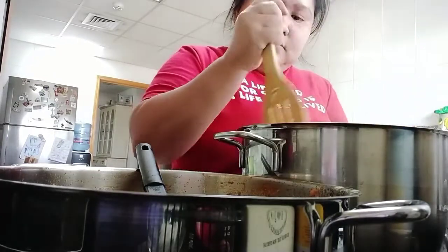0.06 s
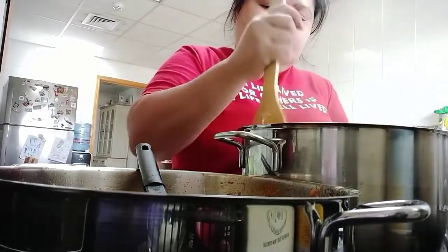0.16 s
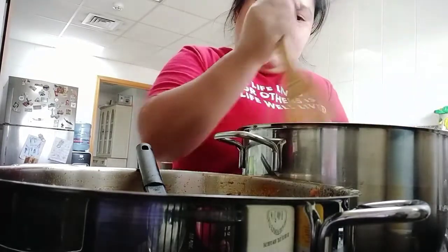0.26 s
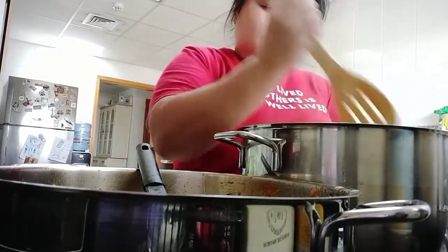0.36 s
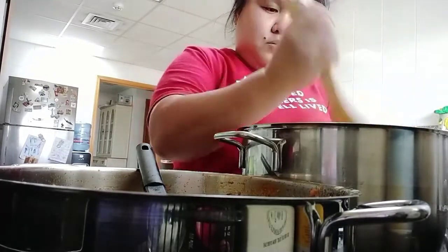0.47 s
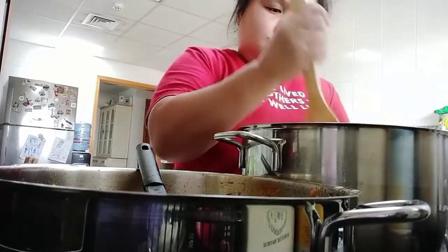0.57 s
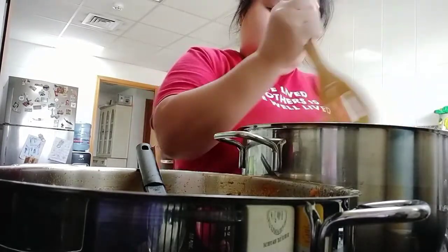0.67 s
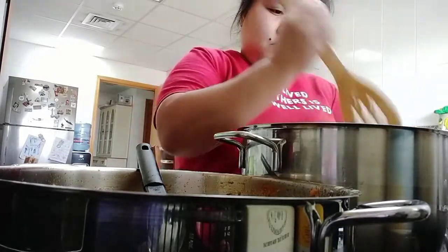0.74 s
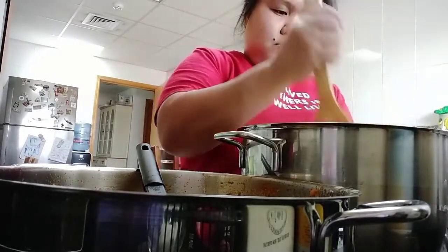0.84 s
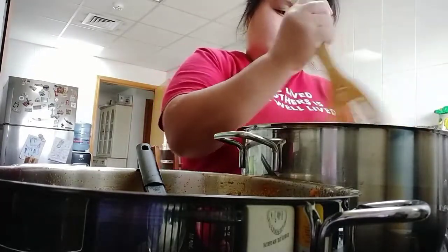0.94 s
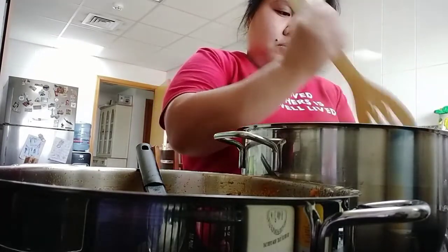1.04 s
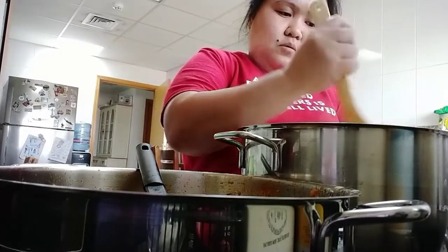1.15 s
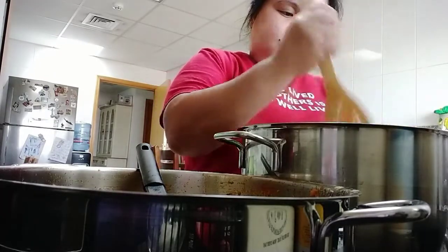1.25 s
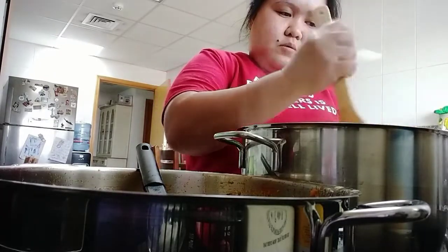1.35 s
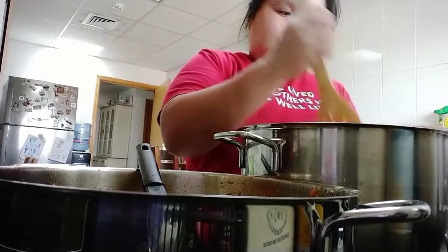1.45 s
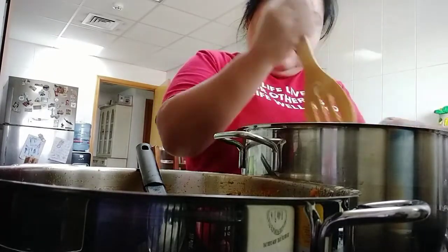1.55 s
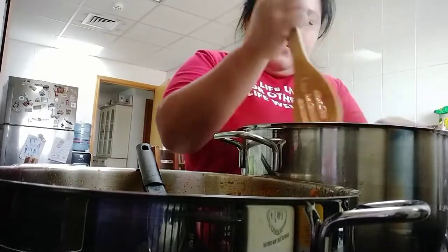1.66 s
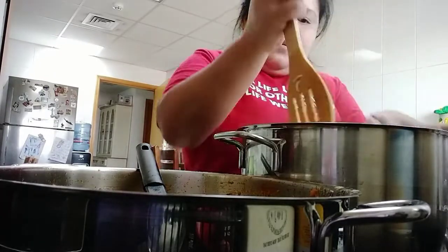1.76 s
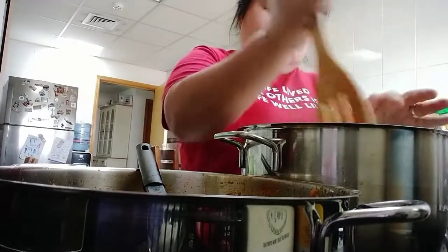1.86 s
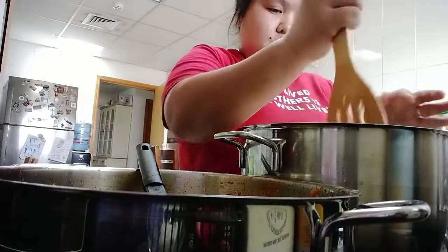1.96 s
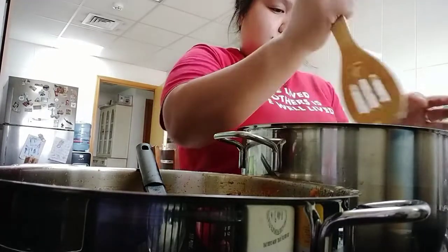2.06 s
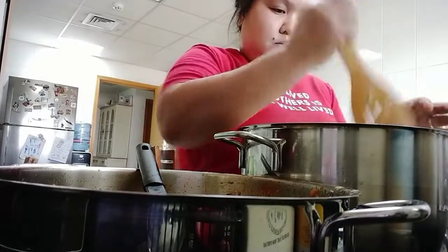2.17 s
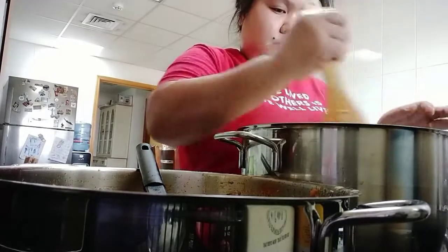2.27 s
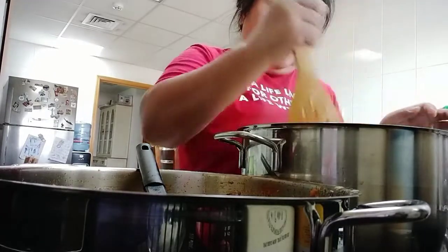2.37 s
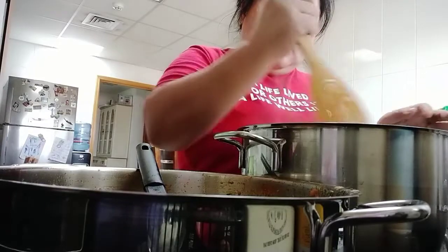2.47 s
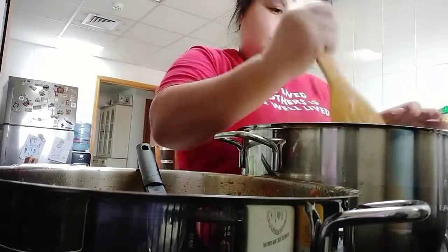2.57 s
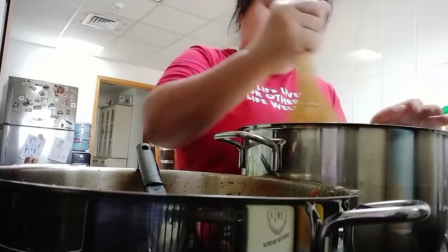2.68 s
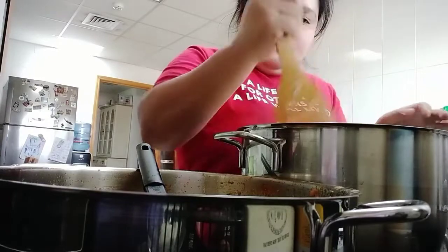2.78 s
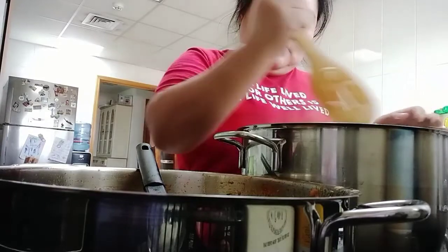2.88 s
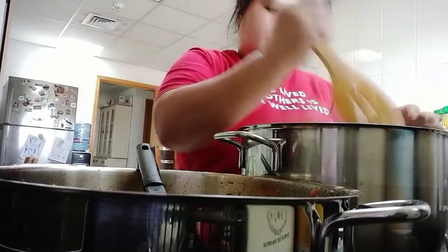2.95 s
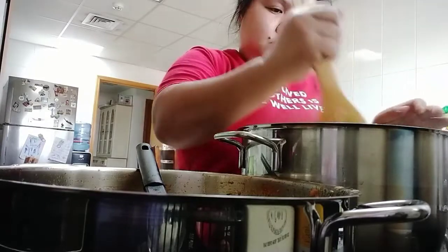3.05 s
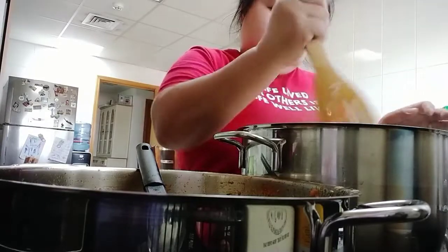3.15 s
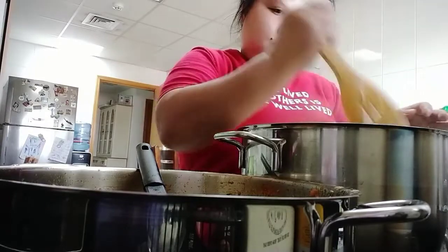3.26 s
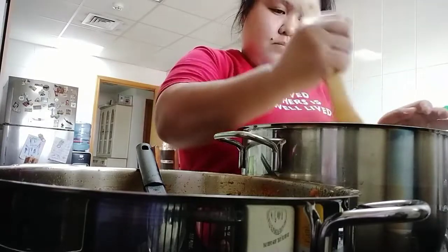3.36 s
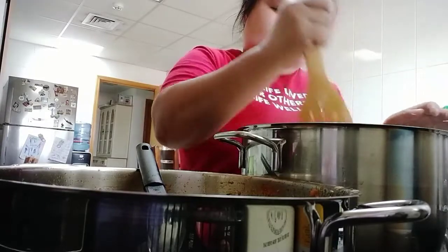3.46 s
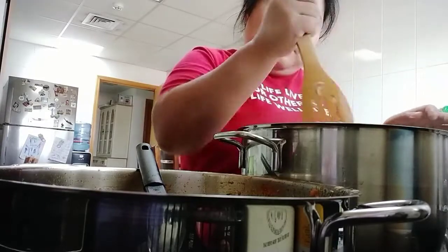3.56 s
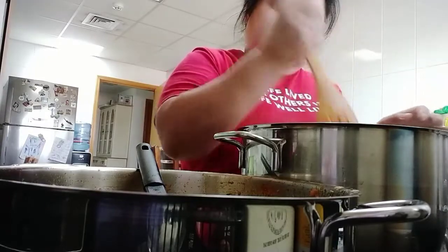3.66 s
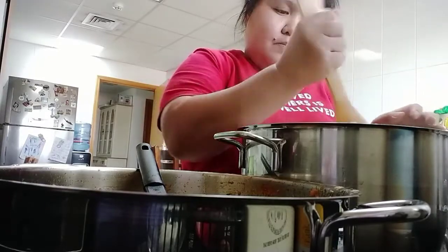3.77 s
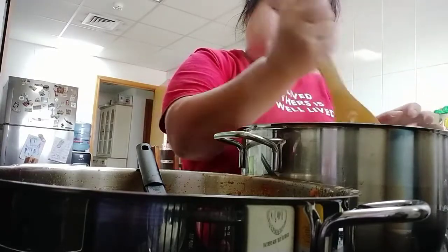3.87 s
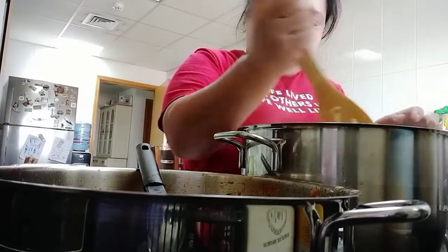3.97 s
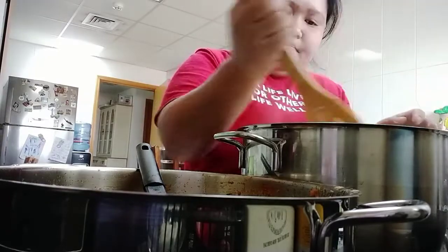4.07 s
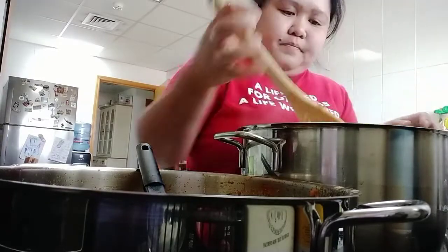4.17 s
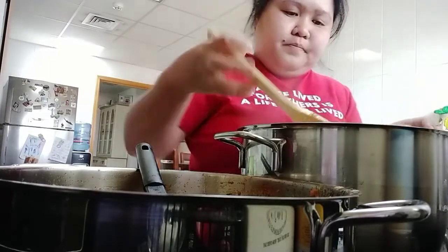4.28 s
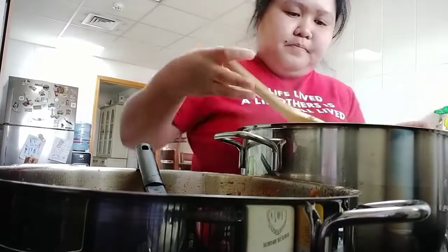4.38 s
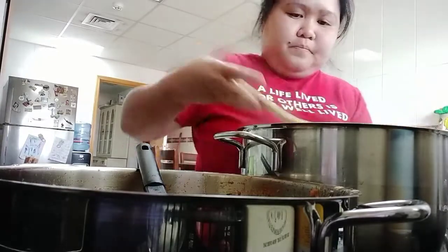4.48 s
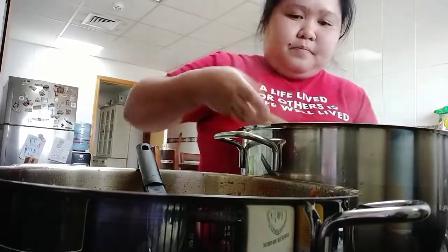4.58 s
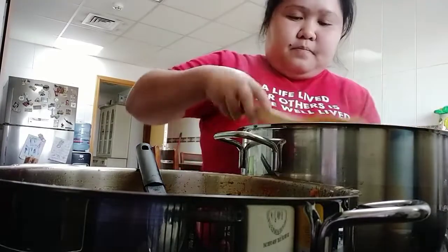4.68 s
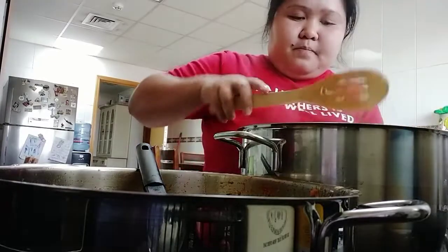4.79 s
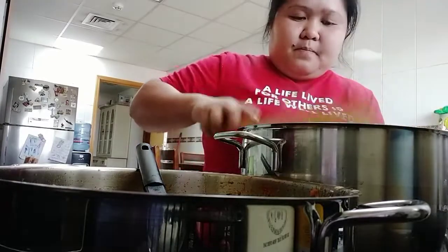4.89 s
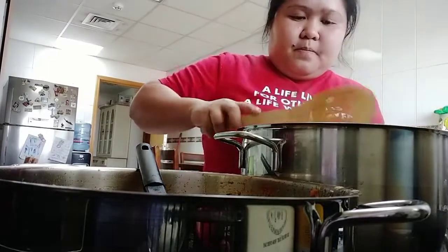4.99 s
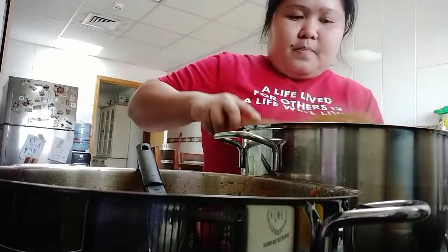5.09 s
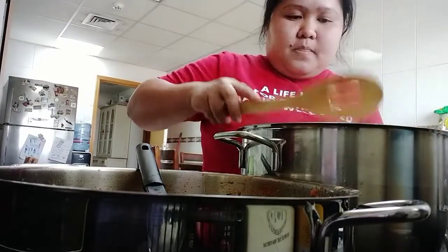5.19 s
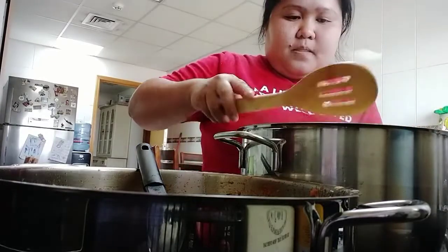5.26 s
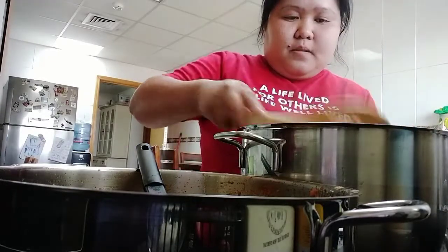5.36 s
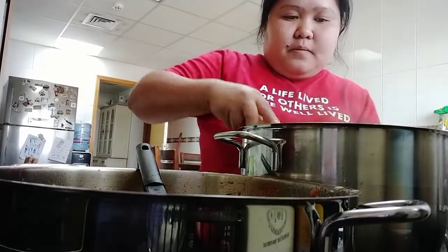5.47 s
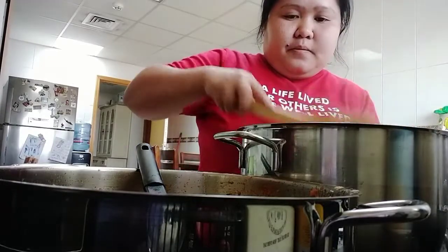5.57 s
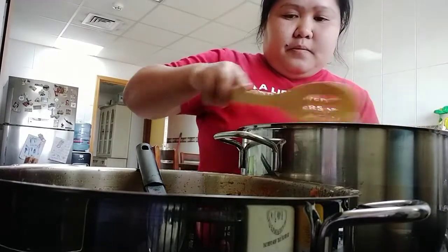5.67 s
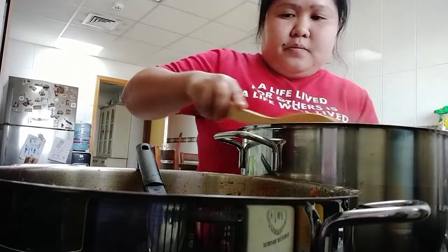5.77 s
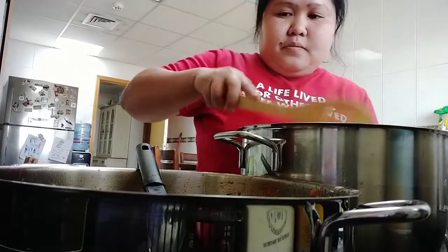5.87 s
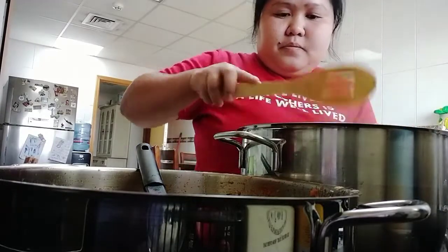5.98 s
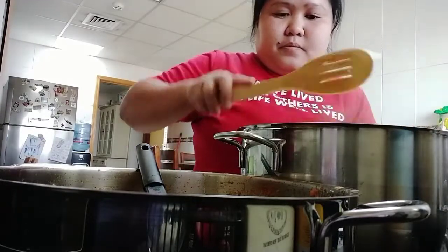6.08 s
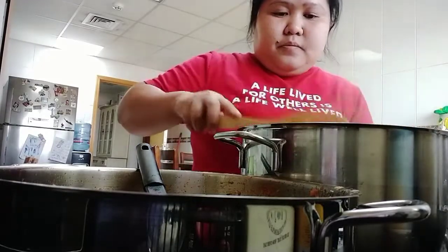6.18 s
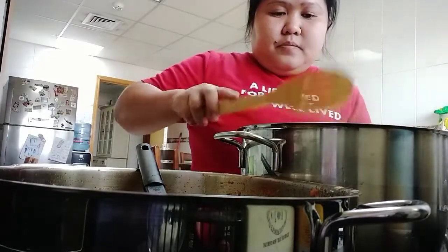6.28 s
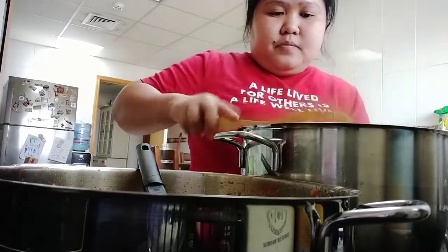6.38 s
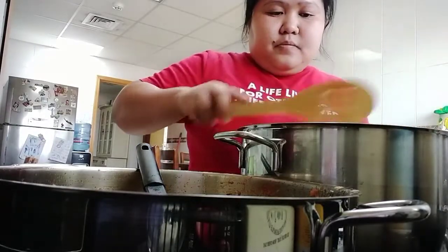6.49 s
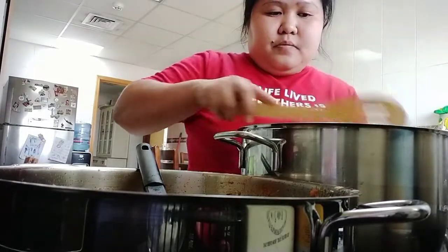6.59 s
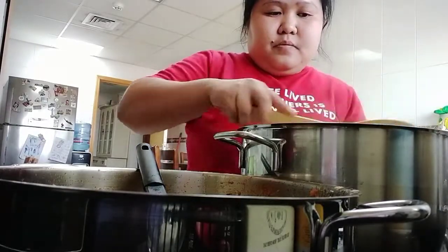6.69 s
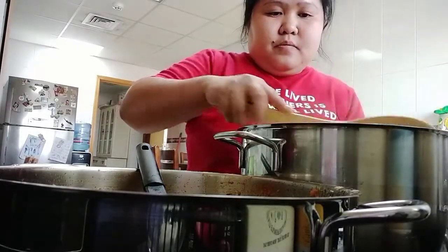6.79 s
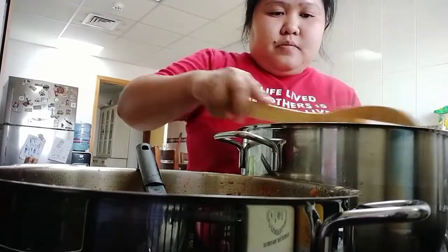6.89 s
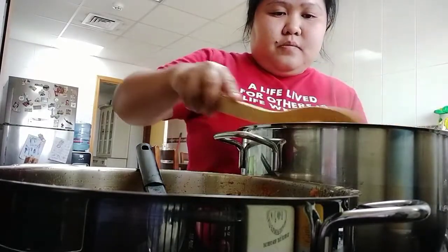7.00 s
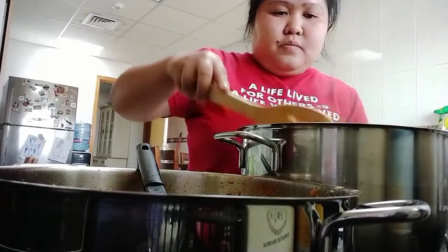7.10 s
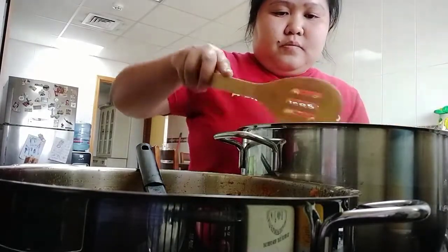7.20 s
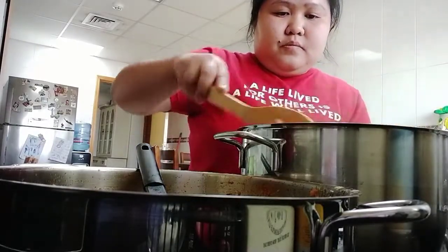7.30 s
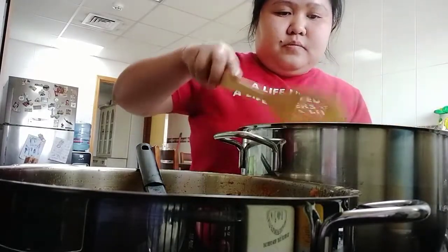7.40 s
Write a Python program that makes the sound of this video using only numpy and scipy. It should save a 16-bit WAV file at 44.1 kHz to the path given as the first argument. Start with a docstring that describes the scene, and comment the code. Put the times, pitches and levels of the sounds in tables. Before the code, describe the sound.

Over a steady burner rush and throbbing low hum, faint stirring and dull bumps lead to four hard wood-on-steel knocks in a tiled kitchen.

```python
"""A wooden spoon bumps and stirs inside a large steel pot, then raps its rim in two pairs of knocks.
Pot and spoon ring as decaying sines; wood on steel, swishes and ticks are shaped noise.
Beneath: a burner's noise rush and rumble, a motor beating against mains hum, a dying clink, thin whistles.
A tiled kitchen answers the knocks with reflections and a tail; a limiter ducks under the loudest peaks."""
import sys
import numpy as np
from scipy import signal
from scipy.fft import rfft, irfft, next_fast_len
from scipy.io import wavfile
from scipy.ndimage import uniform_filter1d, minimum_filter1d, map_coordinates

SR = 44100
rng = np.random.default_rng(int(sys.argv[2]) if len(sys.argv) > 2 else 0)


def generate_wav(signal):
    """Clip the signal to [-1, 1] and save it as 16-bit WAV at the path in sys.argv[1]."""
    frames = np.transpose(np.atleast_2d(signal))
    scaled = np.clip(frames, -1, 1) * 32767
    pcm = np.round(scaled).astype(np.int16)
    wavfile.write(sys.argv[1], SR, pcm)


N = 328104
TIME = np.arange(N) / SR


def amp(db):
    """Decibels to gain."""
    return 10 ** (np.asarray(db) / 20)


def unit(x):
    """x at rms 1."""
    return x / np.sqrt(np.mean(x ** 2) + 1e-20)


def along(points, hz):
    """(pitch_hz, value) points read on a log frequency axis."""
    point_hz, value = np.transpose(points)
    return np.interp(np.log(hz + 1), np.log(point_hz + 1), value)


def filtered(x, response):
    """x times a response of frequency, zero-padded against wrap-around."""
    size = next_fast_len(len(x) + 8192)
    spectrum = rfft(x, size) * response(np.fft.rfftfreq(size, 1 / SR))
    return irfft(spectrum, size)[:len(x)]


def noise(colour, size=N):
    """Noise of rms 1 with the given colour: (pitch_hz, relative_db)."""
    white = rng.standard_normal(size)
    return unit(filtered(white, lambda hz: amp(along(colour, hz))))


def wobble(knots_per_s):
    """A smooth random curve through random knots."""
    knots = rng.standard_normal(int(N * knots_per_s / SR) + 4)
    return map_coordinates(knots, [TIME * knots_per_s])


def fade(t, rise_s, t60_s):
    """A quick swell that dies away."""
    return (1 - np.exp(-t / rise_s)) * amp(-60 * t / t60_s)


def add(track, start_s, sound):
    """Mix a sound into the track, cut at its end."""
    part = track[round(start_s * SR):][:len(sound)]
    part += sound[:len(part)]


def ringing(modes, t, rise_s):
    """Neighbouring modes swing in opposite directions, so the ring takes a few ms to build."""
    ring = 0
    for k, (hz, db, t60_s) in enumerate(modes):
        level = amp(db + rng.normal(0, 0.86))
        ring = ring + (-1) ** k * level * fade(t, rise_s, t60_s) * np.sin(2 * np.pi * hz * t)
    return ring


# room tail by band: pitch_hz, t60_s
KITCHEN_DECAY = [(100, 0.9), (300, 0.69), (700, 0.34), (1400, 0.47), (4400, 0.5), (8000, 0.36),
                 (14000, 0.28)]
# near reflecting surfaces: delay_s, gain
NEAR_SURFACES = [(.00414, .31), (.01566, .2), (.02093, .1)]


def kitchen(x, wet_db):
    """x with its near reflections and a tail in which each band dies at its own speed."""
    hz, t, bands = signal.stft(rng.standard_normal(SR), SR, nperseg=256)
    decay = fade(t, 0.011, along(KITCHEN_DECAY, hz)[:, None])
    tail = signal.istft(bands * decay, SR, nperseg=256)[1]
    answer = amp(wet_db) * tail / np.linalg.norm(tail)
    for delay_s, gain in NEAR_SURFACES:
        answer[round(delay_s * SR)] += gain
    return x + signal.fftconvolve(x, answer)[:len(x)]


# flame and air: pitch_hz, relative_db
FLAME_COLOUR = [(100, 0), (160, -7), (192, 0), (215, -5), (262, 2), (300, -8), (550, -8), (1050, -0.5),
                (1750, -6), (2800, -20.5), (3400, -30.5), (5000, -37.5), (10000, -42.5), (15500, -38.5)]
# low rumble: pitch_hz, relative_db
RUMBLE_COLOUR = [(12, -7.5), (22, 1.5), (33, -0.5), (47, -12), (58, 4.5), (75, -10), (110, -21), (160, -39),
                 (400, -80)]
FLAME_DB, RUMBLE_DB = -54, -59.5


def burner():
    """The flame rushes steadily, wavering a little, over a low rumble."""
    rush = amp(FLAME_DB + 0.34 * wobble(8.2)) * noise(FLAME_COLOUR)
    return rush + amp(RUMBLE_DB) * noise(RUMBLE_COLOUR)


# steady motor lines: pitch_hz, rms_db
MOTOR_LINES = [(21.2, -58.5), (57, -63), (193.1, -76.5), (200, -91), (272, -84)]


def motors():
    """A motor slips just under the mains hum, so the two beat at the slip frequency."""
    mains_hz, slip_hz, quiet_s = 100, 3.448, .04  # quiet_s: a moment when the two oppose
    turn = 2 * np.pi * (TIME - quiet_s)
    mains = amp(-58.0) * np.sin(mains_hz * turn)
    slipping_db = -62.5 + 0.85 * wobble(1.8)
    slipping = amp(slipping_db) * np.sin((mains_hz - slip_hz) * turn + 0.096 * wobble(0.8))
    lines = sum(amp(db) * np.sin(hz * turn + .5 * wobble(2.04)) for hz, db in MOTOR_LINES)
    return np.sqrt(2) * (mains - slipping + lines)  # rms to peak


# clink left in the room: pitch_hz, relative_db
CLINK_WASH = [(1000, 10.5), (2600, 1.5), (3150, 6), (3600, -8), (4400, 2), (5200, -7), (6400, -3.5),
              (8500, -8), (11000, -20), (16000, -28)]


def opening_ring():
    """A bright wash from an earlier clink dies away in the room."""
    return amp(-49) * noise(CLINK_WASH) * amp(-60 * TIME / 0.57)


# thin whistles: start_s, length_s, start_pitch_hz, crest_db
WHISTLE_EVENTS = [(0, 1.52, 6462, -72), (4.182, .4, 6260, -82)]
WHISTLE_ATTACK_S, WHISTLE_RELEASE_S = .02, 0.16
WHISTLE_SWELL_DB, SAG_HZ_PER_S = 7.5, 95


def whistle():
    """Each thin whistle swells to its middle, sinks in pitch and flutters like a narrow band of noise."""
    out = np.zeros(N)
    for start_s, length_s, pitch_hz, crest_db in WHISTLE_EVENTS:
        t = TIME - start_s
        gate = np.clip(np.minimum(t / WHISTLE_ATTACK_S, (length_s - t) / WHISTLE_RELEASE_S), 0, 1)
        waver_db = 2 * wobble(14)
        level_db = crest_db - WHISTLE_SWELL_DB * np.abs(2 * t / length_s - 1) + waver_db
        sagging_hz = pitch_hz - SAG_HZ_PER_S * t + 35 * wobble(500)
        phase = 2 * np.pi * np.cumsum(sagging_hz) / SR
        flutter = 0.38 * (wobble(90) * np.sin(phase) + wobble(90) * np.cos(phase))
        out += gate * amp(level_db) * (0.92 * np.sin(phase) + flutter)
    return out


# spoon against the inner wall: start_s, knock_gain_db, knock_pitch_hz, tick_gain_db, tick_pitch_hz, tick_t60_s
WALL_BUMPS = [(0.41, -67, 990, -60.5, 4500, .025), (1.8118, -32.5, 1055, -47.5, 3550, 0.016),
              (1.8857, -41.5, 921, -55.5, 4700, 0.046), (2.033, -73, 1010, -65, 3500, .025),
              (4.186, -70, 1000, -53, 4340, 0.02)]
# wall modes damped by food: ratio_to_knock_pitch, relative_db, t60_s
DAMPED_MODES = [(0.217, -22.5, .15), (0.379, -7, .1), (0.569, -10.5, .07), (.73, -13.5, .06),
                (0.999, 3.5, 0.092), (1.27, -9, 0.039), (2.93, -17, 0.038), (3.72, -20, .025)]


def bumps():
    """Against the inner wall the food damps the spoon to a dull knock, soft thud and tick, longer if it skids."""
    out, t = np.zeros(N), np.arange(SR // 4) / SR
    thud_colour = [(150, -20), (350, 0), (1100, 8), (2000, -23), (4000, -54)]
    for start_s, knock_db, knock_hz, tick_db, tick_hz, tick_t60_s in WALL_BUMPS:
        modes = [(knock_hz * ratio, db, t60_s) for ratio, db, t60_s in DAMPED_MODES]
        knock = ringing(modes, t, rise_s=0.0015)
        thud = amp(-7.5) * noise(thud_colour, size=len(t)) * fade(t, 0.0026, 0.074)
        band = [(tick_hz / 2, -16), (tick_hz * 0.67, 0), (tick_hz * 1.13, -1), (tick_hz * 2, -24)]
        tick = amp(tick_db) * noise(band, size=len(t)) * fade(t, 0.00072, tick_t60_s)
        add(out, start_s, amp(knock_db) * (knock + thud) + tick)
    return kitchen(out, wet_db=-10.5)


# strokes through the food: crest_s, level_db, release_s
STIR_STROKES = [(.45, -78, .03), (1.662, -64, 0.027), (2.214, -72, .018), (2.395, -72, .013),
                (2.635, -77, .028), (3.0, -76, .03), (3.345, -72.5, 0.021), (4.117, -65.5, 0.02),
                (4.27, -74, .09), (4.575, -77.5, .025), (4.76, -66, 0.037)]
# swish colour: pitch_hz, relative_db
SWISH_COLOUR = [(1500, -34), (4000, 2), (5300, 3), (6500, 1.5), (8200, 5.5), (10000, -6), (15500, 1.5)]
STROKE_RISE = 1.8  # rise time constant / release time constant


def stirring():
    """Every stroke is a soft, grainy swish that gathers to a crest and then lets go."""
    envelope = np.zeros(N)
    for crest_s, db, release_s in STIR_STROKES:
        distance_s = np.maximum((crest_s - TIME) / STROKE_RISE, TIME - crest_s)
        envelope += amp(db) * np.exp(-distance_s / release_s)
    grain_db = 1.8 * wobble(250)
    return envelope * unit(noise(SWISH_COLOUR) * amp(grain_db))


# spoon on the rim: start_s, gain_db, low_ring_db, high_ring_db, bright_db, hard_edge_db,
# free_share (of the low modes' t60 that the grip leaves)
RIM_RAPS = [(4.9038, 1, -2, 1.5, -8, -7, 0.9), (5.059, -0.5, -1, 2.5, -1, 3, 0.81),
            (6.1349, 0, -2, -2.5, 0, -9.5, 0.75), (6.3618, 7, -7.5, 1.5, 0.5, 4, 0.43)]
# loaded pot modes before colour and grip: pitch_hz, level_db, t60_s
POT_MODES = [(71, -42.0, 0.6), (184, -42.5, 0.3), (221, -34.0, 0.3), (276, -39.5, 0.5), (342, -29.5, 0.2),
             (381, -36.0, 0.3), (444, -37.0, 0.14), (521, -30.0, 0.12), (595, -21.5, 0.04),
             (615, -38.5, 0.24), (674, -33.0, 0.18), (735, -31.0, 0.19), (885, -37.0, 0.17),
             (993, -29.5, 0.24), (1070, -25.0, 0.22), (1147, -30.0, 0.19), (1235, -18.0, 0.11),
             (1301, -33.0, 0.24), (1404, -25.0, 0.23), (1503, -25.0, 0.15), (1585, -38.5, 0.24),
             (1798, -30.0, 0.1), (1910, -39.5, 0.07), (2300, -51.0, 0.27), (2785, -55.0, 0.17),
             (2950, -55.5, 0.24), (3120, -55.5, 0.24), (4300, -57.0, 0.3), (4430, -55.5, 0.18),
             (6365, -45.5, 0.24)]
# hand-held wooden spoon modes before colour: pitch_hz, level_db, t60_s
SPOON_MODES = [(95, -31.5, 0.19), (182, -21.5, 0.03), (387.6, -25.5, 0.074), (677, -25.5, 0.066),
               (1068, -13, 0.045), (1256, -4, 0.012)]
# dense, short ring of wood on steel: pitch_hz, relative_db
CLACK_COLOUR = [(60, -25), (190, 6.5), (400, 8), (900, 13), (1800, 1.5), (2500, -9.5), (3000, -3),
                (3600, -20), (4400, -6), (5100, -24), (5900, -10), (6800, -6), (8300, -10.5), (10000, -22)]


def raps():
    """Each rap rings pot and spoon; where and how hard the wood lands sets the colour, the grip damps the ring."""
    out, t = np.zeros(N), np.arange(SR) / SR
    for start_s, gain_db, low_db, high_db, bright_db, edge_db, free_share in RIM_RAPS:
        colour = [(750, 0.02), (1100, low_db), (1400, high_db), (1800, 0), (4400, 0.0089),
                  (6200, bright_db), (8500, bright_db), (11500, edge_db)]
        grip = [(1500, free_share), (2500, 0.72)]  # pitch_hz, share of t60 left
        pot = [(hz, db + along(colour, hz), t60_s * along(grip, hz)) for hz, db, t60_s in POT_MODES]
        spoon = [(hz, db + along(colour, hz), t60_s) for hz, db, t60_s in SPOON_MODES]
        ring = ringing(pot, t, rise_s=0.00015) + ringing(spoon, t, rise_s=0.00052)
        grain = filtered(noise(CLACK_COLOUR, size=SR), lambda hz: amp(along(colour, hz)))
        crack = amp(-9.5) * grain * fade(t, 0.0045, 0.019)
        # the highest partials die with the crack; the rest shimmer on in the steel
        lower_grain = filtered(grain, lambda hz: 1 / (1 + (hz / 10000) ** 8))
        shimmer = amp(-33) * lower_grain * fade(t, 0.0022, 0.18)
        knock = kitchen(ring, wet_db=-12.5) + kitchen(crack + shimmer, wet_db=-7.5)
        add(out, start_s, amp(gain_db) * knock)
    return out


def scene():
    """All sources at one microphone."""
    background = burner() + motors() + opening_ring() + whistle()
    return (background + bumps() + stirring() + raps())[None]


def limiter(x, ceiling_db, hold_s):
    """The gain drops at a peak, holds, and comes back quickly."""
    needed = np.minimum(1, amp(ceiling_db) / (np.abs(x) + 1e-9))
    span = int(hold_s * SR) | 1
    held = minimum_filter1d(needed, span, origin=span // 2 - SR // 400)  # 2.5 ms look-ahead
    return x * uniform_filter1d(held, size=SR // 200)  # 5 ms gain ramps


TOP_HZ = 15900


def record(dry):
    """A limiter, then a steep low-pass at TOP_HZ."""
    limited = limiter(dry[0], ceiling_db=-9, hold_s=.095)
    return filtered(limited, lambda hz: 1 / (1 + (hz / TOP_HZ) ** 120))[None]


dry = scene()
out = record(dry)
generate_wav(out)
```